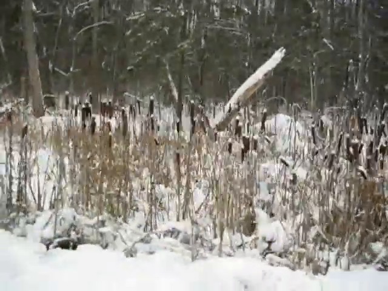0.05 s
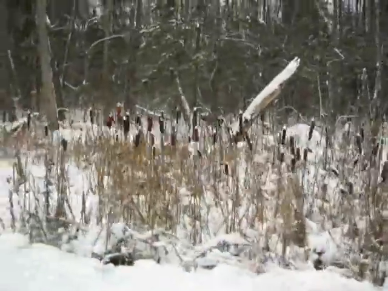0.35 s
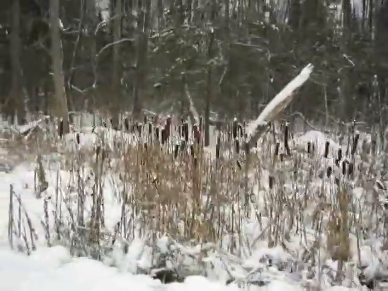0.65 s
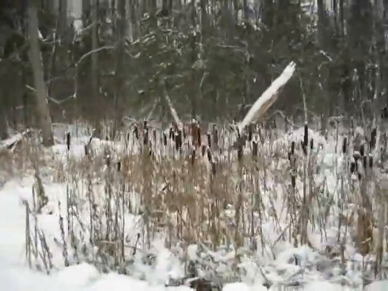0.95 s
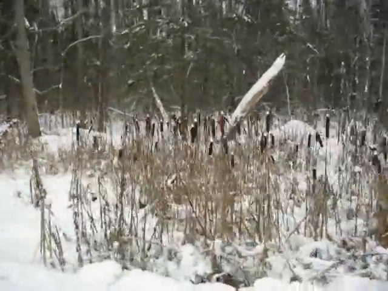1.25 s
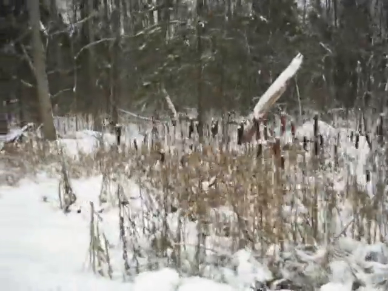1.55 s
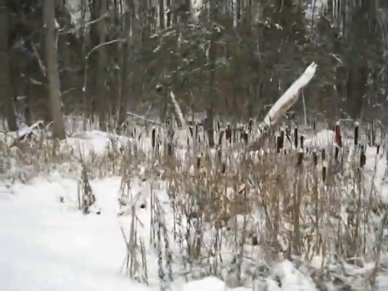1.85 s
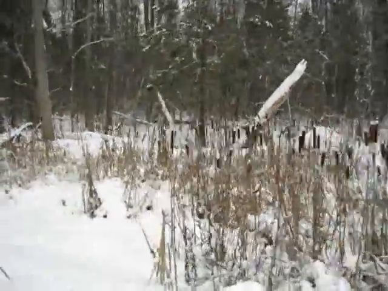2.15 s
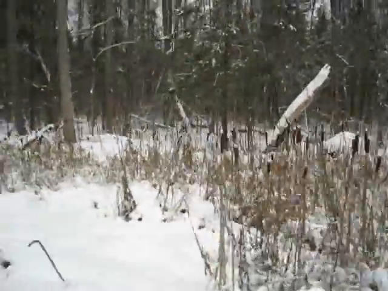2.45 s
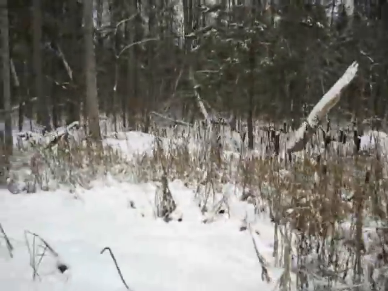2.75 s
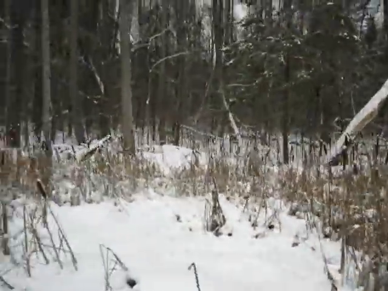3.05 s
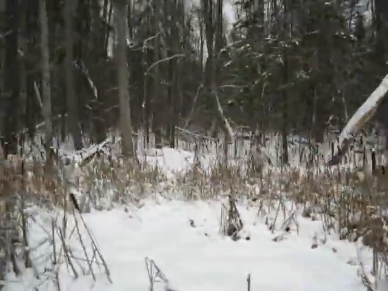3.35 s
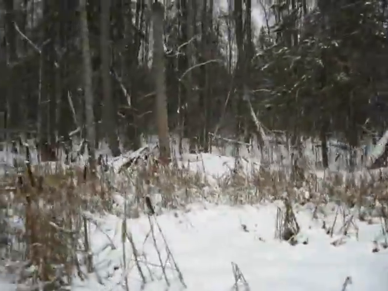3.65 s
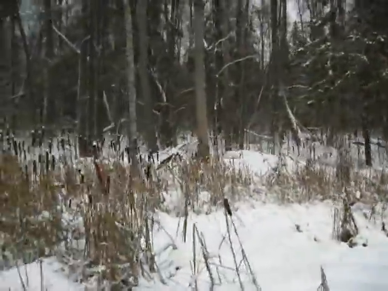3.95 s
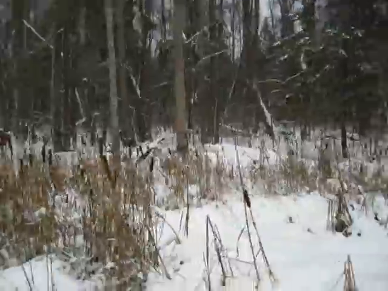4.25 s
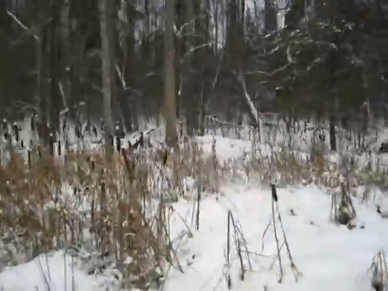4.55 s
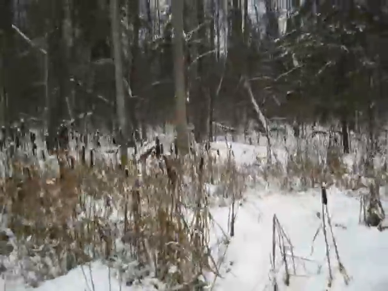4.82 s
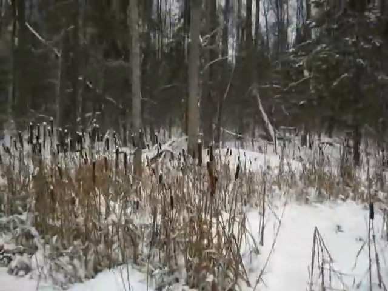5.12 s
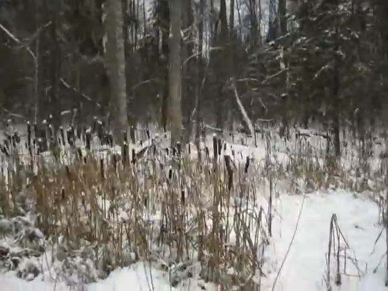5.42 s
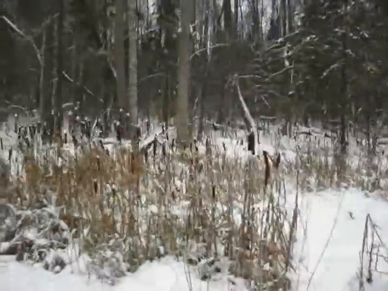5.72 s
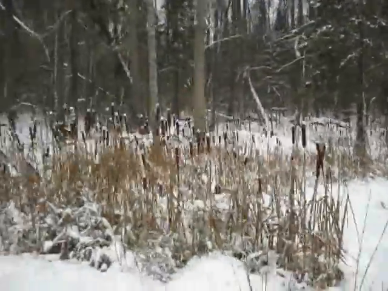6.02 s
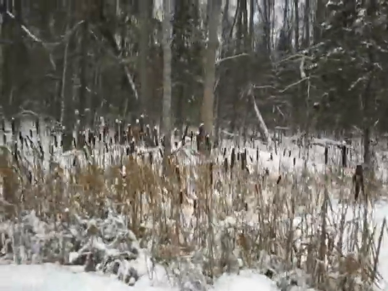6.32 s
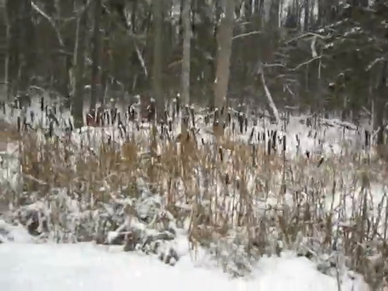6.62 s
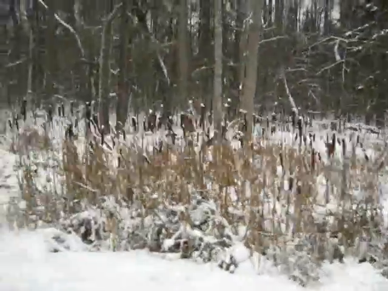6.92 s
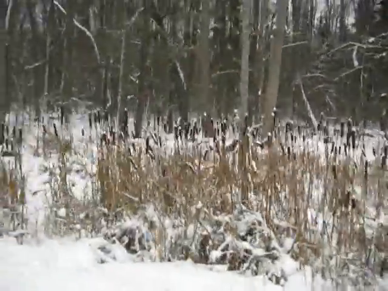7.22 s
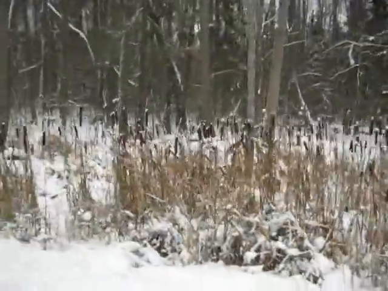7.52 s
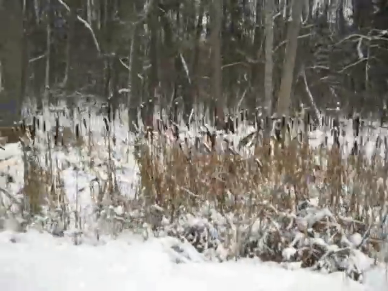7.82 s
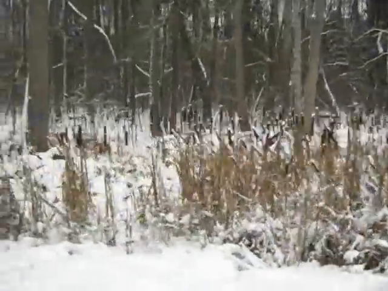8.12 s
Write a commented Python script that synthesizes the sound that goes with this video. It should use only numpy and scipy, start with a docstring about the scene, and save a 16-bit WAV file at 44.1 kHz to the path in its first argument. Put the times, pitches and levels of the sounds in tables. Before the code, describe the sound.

Steady outdoor hiss with a gritty edge, under the low rumble, soft bumps and sharp plastic clicks of a handled camera.

```python
"""A still, snowy marsh, heard from the one microphone of a small, panning hand-held camera.
From the start, faint air hisses out in the reeds and trees; right at the microphone the camera hums
and the hand rumbles, knocks and bumps on the case. After a second, cloth scuffs nearby, then the
plastic clicks. The hardest bump comes near 4.7 s, the sharpest clicks at 5 and 6.5 s.
Throughout, the camera's coarse 8-bit steps lay a gritty hiss over everything."""
import sys
import numpy as np
from scipy import signal
from scipy.fft import rfft, irfft
from scipy.io import wavfile

SR = 44100
rng = np.random.default_rng(int(sys.argv[2]) if len(sys.argv) > 2 else 0)


def store_pcm(level_fs):
    """Save levels as 16-bit WAV."""
    pcm = np.round(np.clip(level_fs, -1, 1) * 32767).astype(np.int16)
    wavfile.write(sys.argv[1], SR, np.atleast_2d(pcm).T)


N = 364707
TIME = np.arange(N) / SR

# colour of the air over the marsh: (frequency [Hz], relative level [dB])
AIR_SPECTRUM = [(20, 2), (120, -1), (330, 1), (520, -0.5), (700, -2.5), (920, 0.5), (1250, -1.5),
                (1650, -3.5), (2100, -6.5), (2700, -11), (3800, -12), (5500, -14)]
# soft swells of air out in the reeds: (time [s], rise [dB])
AIR_SWELLS = [(.03, 2), (.42, 3), (1.02, 2.5), (2.81, 2.5), (3.15, 2), (4.24, 2), (4.85, 3), (5.39, 4.5),
              (5.95, 2.5), (6.99, 4), (7.52, 3.5)]
# hum and whine of the camera: (frequency [Hz], rms level [dB])
HUM_TONES = [(539, -65), (4148, -78), (5005, -81)]
# colour of the hand's rumble at the microphone: (frequency [Hz], relative level [dB])
RUMBLE_SPECTRUM = [(8, -12), (22, -3), (45, 1), (72, -1), (115, -7), (180, -17), (260, -25), (500, -45)]
# the hand shifts its grip to turn the camera: (start [s], length [s], level [dB])
GRIP_SHIFTS = [(0.171, .58, -46.5), (.98, 0.36, -42), (1.43, 1.07, -43), (2.838, 0.14, -43),
               (3.21, .32, -42.5), (3.56, 0.3, -38.5), (3.967, 0.3, -42), (4.589, .19, -37),
               (4.821, 0.3, -46.5), (5.261, .05, -49.5), (5.698, .4, -55), (6.17, .28, -38),
               (6.671, .18, -40), (7.04, 0.82, -42.5), (7.923, .15, -39)]
# dull knocks under the fingers, and at 1.457 and 1.648 s the low thud under the case clicks: (time [s], peak
# level [dB], pitch [Hz])
FINGER_KNOCKS = [(.047, -41, 466), (.231, -38, 374), (.318, -34.5, 757), (.327, -32.5, 350),
                 (.496, -34.5, 440), (.744, -38.5, 415), (1.457, -32.5, 429), (1.648, -28, 460),
                 (2.570, -27.5, 435), (2.614, -35.5, 474), (3.485, -35.5, 565), (3.659, -33, 383),
                 (4.587, -33.5, 502), (4.740, -31, 361), (5.667, -35, 370), (5.7, -35.5, 402),
                 (5.797, -29.5, 708), (6.003, -37, 480), (6.252, -35, 912), (7.964, -32.5, 683),
                 (7.968, -30, 329)]
# firm bumps of the fingers on the case: (time [s], relative level [dB], pitch [Hz])
FINGER_BUMPS = [(.234, -33, 215), (.993, -31, 130.4), (1.225, -31.5, 145), (1.288, -30, 190),
                (1.466, -30.5, 129), (1.826, -34, 249), (2.154, -32, 182), (2.182, -32.5, 159),
                (2.981, -35, 230), (3.802, -26.5, 120), (3.859, -21.5, 157), (3.996, -30, 145),
                (4.178, -24, 151.4), (4.651, -18, 146.5), (4.757, -24.5, 145), (6.193, -27.5, 188),
                (6.256, -27.5, 164), (6.276, -27, 202), (6.386, -24.5, 121), (6.703, -25, 111.3),
                (6.739, -27.5, 116), (6.78, -27.5, 155.3), (7.293, -25.5, 132), (7.469, -29, 110),
                (7.625, -29, 100), (7.947, -30, 121), (8.072, -29, 95)]
# cloth near the microphone: (time [s], level [dB], pitch [Hz], length [s], width [octaves])
CLOTH_SCUFFS = [(1.153, -50.5, 2180, 0.016, .43), (2.203, -50, 2120, 0.028, 0.38),
                (3.329, -45.5, 2100, 0.0056, .31), (3.347, -44.5, 1740, 0.0062, 0.12),
                (3.3956, -41, 1850, 0.0033, .36), (3.5496, -40.5, 1960, .0028, .27),
                (3.865, -41, 1890, 0.012, .24), (4.42, -46.5, 1996, 0.032, 0.44),
                (5.661, -44, 1620, .032, .56), (5.916, -49.5, 2070, 0.033, .49),
                (6.62, -51.5, 2360, .016, 0.31), (7.909, -44, 2130, 0.0094, 0.32)]
# snaps of the plastic: (time [s], peak level [dB], tilt [dB/octave], mode tuning [ratio],
# low edge [Hz], top edge [Hz], rebound [ratio])
CASE_CLICKS = [(1.4567, -22.5, 2.5, .9, 306, 5530, .55), (1.6484, -19, 2.6, .88, 270, 5160, .65),
               (2.5632, -17, 4, 1.02, 373, 3670, 0.13), (3.7023, -18.5, -4, 1.08, 842, 1800, 0),
               (5.0080, -10, -1.4, .99, 376, 4080, 0), (6.491, -9, -1.2, 1.025, 387, 4680, 0)]
# resonances of the case: (frequency [Hz], width [Hz], relative level [dB])
CASE_MODES = [(684, 590, -11.5), (895, 73, 0.5), (1154, 140, -2.5), (1344, 420, -7), (2064, 240, -4.5),
              (2525, 170, -5), (3610, 210, -13), (5200, 200, -17)]


def gain_of(db):
    """Decibels to a factor."""
    return 10 ** (np.asarray(db) / 20)


def unit_rms(x):
    """Scales to an rms of one."""
    return x / np.sqrt(np.mean(x ** 2) + 1e-20)


def coloured_noise(spectrum):
    """Noise shaped by rows of (frequency [Hz], level [dB]), at an rms of one."""
    hz, db = np.transpose(spectrum)
    shape_db = np.interp(np.log(np.fft.rfftfreq(N, 1 / SR) + 1), np.log(hz + 1), db)
    return unit_rms(irfft(rfft(rng.standard_normal(N)) * gain_of(shape_db), N))


def band_noise(size, hz, octaves):
    """Noise in a bell-shaped band around hz, at an rms of one."""
    away = np.log2((np.fft.rfftfreq(size, 1 / SR) + 1) / hz) / octaves
    return unit_rms(irfft(rfft(rng.standard_normal(size)) * np.exp(-.5 * away ** 2), size))


def wander(rate_hz):
    """A slow random curve with an rms of one."""
    lowpass = np.exp(-.5 * (np.fft.rfftfreq(N, 1 / SR) / rate_hz) ** 2)
    return unit_rms(irfft(rfft(rng.standard_normal(N)) * lowpass, N))


def add(mix, s, sound):
    """Mixes a sound in at time s."""
    part = mix[max(round(s * SR), 0):][:len(sound)]
    part += sound[:len(part)]


def marsh_air(level_db=-52, swell_s=.06, drift_db=.5, flutter_db=1.0):
    """Air out in the reeds and trees: a soft hiss that drifts, flutters and now and then swells."""
    hiss = coloured_noise(AIR_SPECTRUM)
    swells_db = sum(db * np.exp(-.5 * ((TIME - s) / swell_s) ** 2) for s, db in AIR_SWELLS)
    unrest_db = drift_db * wander(rate_hz=3) + flutter_db * wander(rate_hz=14)
    return hiss * gain_of(level_db + swells_db + unrest_db)


def camera_hum(waver_hz=2.5):
    """Faint, slightly unsteady tones of the camera, right beside the microphone."""
    out = np.zeros(N)
    for hz, db in HUM_TONES:
        phase = 2 * np.pi * np.cumsum(hz + waver_hz * wander(rate_hz=6)) / SR
        out += np.sqrt(2) * gain_of(db) * np.sin(phase)
    return out


def hand_effort(rest_db, attack_s=.035, release_s=.06, jerk_hz=5.6, jerk_db=2):
    """How hard the hand works, in dB above rest: each shift builds, holds in small jerks and dies away."""
    level = np.full(N, gain_of(rest_db))
    for start, length, db in GRIP_SHIFTS:
        t = TIME - start
        attack = np.clip(t / attack_s, 0, 1)
        release = np.exp(-np.maximum(t - length, 0) / release_s)
        jerks = np.cos(2 * np.pi * jerk_hz * (t - attack_s))
        level = np.maximum(level, gain_of(db + jerk_db * jerks) * attack * release)
    return 20 * np.log10(level) - rest_db


def microphone_swing(hz, cycles):
    """One push and spring-back of the microphone, 60 ms long, centred, with a peak of one."""
    t = np.arange(-3 * SR // 100, 3 * SR // 100) / SR
    wave = -np.sin(2 * np.pi * hz * t) / np.cosh(2 * hz * t / cycles)
    return wave / wave.max()


def hand_rumble(rest_db=-56, slips_per_s=42, slip_hz=76, spread_octaves=.48, octaves_per_db=.032):
    """The hand sways, and its skin slips on the case in puffs, louder and higher as it works harder."""
    effort_db = hand_effort(rest_db)
    slips = np.zeros(N)
    times = np.cumsum(rng.exponential(1, 1000)) / slips_per_s
    for s, (pitch, size) in zip(times, rng.standard_normal((len(times), 2))):
        if s < N / SR:
            hz = slip_hz * 2 ** (spread_octaves * pitch + octaves_per_db * effort_db[int(s * SR)])
            size_db = 3.5 * min(size, 2)
            add(slips, s, gain_of(size_db) * microphone_swing(hz, cycles=.45))
    swaying = gain_of(.41 + .78 * effort_db) * coloured_noise(RUMBLE_SPECTRUM)
    slipping = gain_of(effort_db - 4) * unit_rms(slips)
    return gain_of(rest_db) * (swaying + slipping)


def finger_knocks(grit=1.1, decay_cycles=2.1):
    """A finger knocks on the case, or a click thuds low beneath its snap: a short, damped low ring, mostly grit
    from the rubbing skin."""
    out, t = np.zeros(N), np.arange(SR // 20) / SR
    for s, db, hz in FINGER_KNOCKS:
        ring = np.sin(2 * np.pi * hz * t) + grit * band_noise(len(t), hz, octaves=.74)
        knock = ring * np.exp(-t * hz / decay_cycles)
        add(out, s, gain_of(db) * knock / abs(knock).max())
    return out


def finger_bumps(trim_db=-1):
    """Firm bumps of the fingers push the microphone itself, with almost no ring."""
    out = np.zeros(N)
    for s, db, hz in FINGER_BUMPS:
        bump = microphone_swing(hz, cycles=.44)
        add(out, s - len(bump) / 2 / SR, gain_of(db + trim_db) * bump)
    return out


def cloth_scuffs(rise_share=.17):
    """Cloth rubs close to the microphone: each a puff of noise that catches quickly and lets go."""
    out, t = np.zeros(N), np.arange(SR // 3) / SR
    for s, db, hz, length, octaves in CLOTH_SCUFFS:
        rub = band_noise(len(t), hz, octaves)
        stroke = (1 - np.exp(-t / (rise_share * length))) * np.exp(-(t / length) ** 2)
        add(out, s, gain_of(db) * rub * stroke / stroke.max())
    return out


def case_clicks(rebound_s=.00112, floor_db=-80, size=4096):
    """Plastic snaps and rings the case around the microphone; a quick rebound makes some sound hollow."""
    out, f = np.zeros(N), abs(np.fft.fftfreq(size, 1 / SR)) + 1
    for s, db, tilt_db, tuning, low_hz, top_hz, rebound in CASE_CLICKS:
        mode_power = sum(gain_of(mode_db) ** 2 / (1 + (2 * (f - hz * tuning) / width) ** 2)
                         for hz, width, mode_db in CASE_MODES)
        band_power = mode_power / (1 + (low_hz / f) ** 6) / (1 + (f / top_hz) ** 4)
        tilt = gain_of(tilt_db * np.log2(f / low_hz))
        log_gain = np.log(np.sqrt(band_power) * tilt + gain_of(floor_db))
        spectrum = np.exp(np.conj(signal.hilbert(log_gain)))  # minimum phase: sharp front, ringing tail
        snap = np.fft.ifft(spectrum).real[:size // 2]
        snap = gain_of(db) * snap / abs(snap).max()
        add(out, s, snap)
        add(out, s + rebound_s, rebound * snap)
    return out


def case_shiver(clicks, relative_db=-20, decay_s=.012):
    """After each click the loose parts of the case shiver on faintly."""
    t = np.arange(SR // 12) / SR
    envelope = np.exp(-t / decay_s) * (1 - np.exp(-2 * t / decay_s))
    tail = band_noise(len(t), hz=1100, octaves=.98) * envelope
    ringing = signal.oaconvolve(clicks, tail)[:N]
    return gain_of(relative_db) * clicks.std() * unit_rms(ringing)


def scene():
    """The marsh beyond and the handling close up, all at the one microphone."""
    bed = marsh_air() + camera_hum() + hand_rumble()
    touches = finger_knocks() + finger_bumps() + cloth_scuffs()
    clicks = case_clicks()
    return (bed + touches + clicks + case_shiver(clicks))[None]


def record(dry, step=.00755, bias_steps=-.85, edge_hz=7450):
    """The camera rounds to 8-bit steps at 12 kHz: this hisses, and sputters when the air is stillest."""
    at_12_khz = signal.resample_poly(dry, 40, 147, axis=1)
    stepped = step * np.round(at_12_khz / step + bias_steps)
    smoothing = signal.firwin(16 * 147 + 1, 1 / 147, window=("kaiser", 9))  # rolls off around 6 kHz
    full_rate = signal.resample_poly(stepped, 147, 40, axis=1, window=smoothing)[:, :N]
    treble_cut = signal.firwin(511, edge_hz, window=("kaiser", 9), fs=SR)
    return signal.oaconvolve(full_rate, treble_cut[None], "same")


dry = scene()
out = record(dry)
store_pcm(out)
```